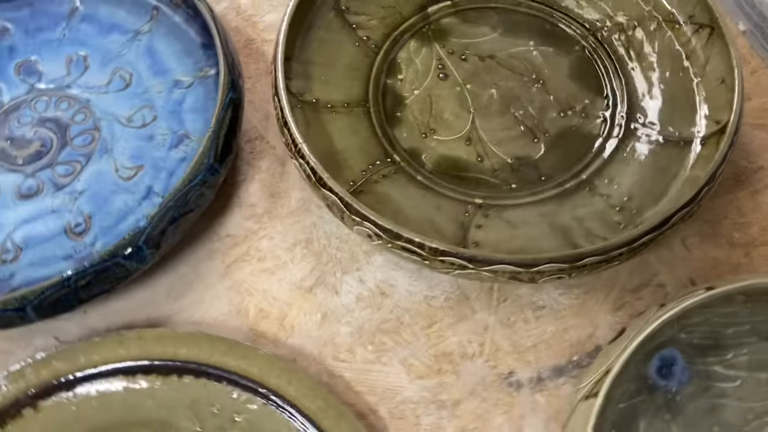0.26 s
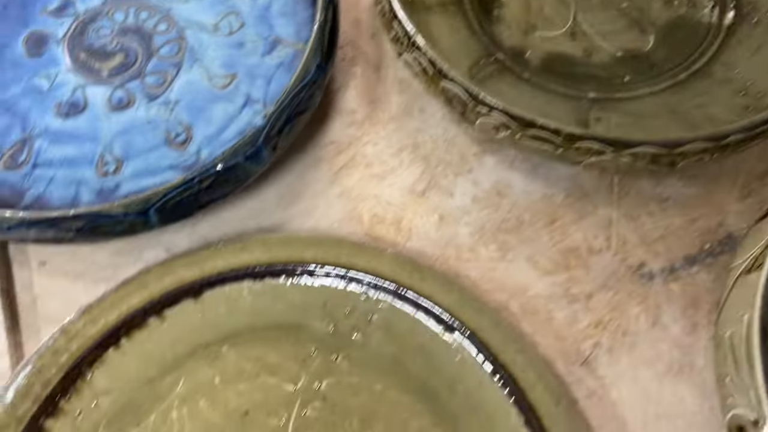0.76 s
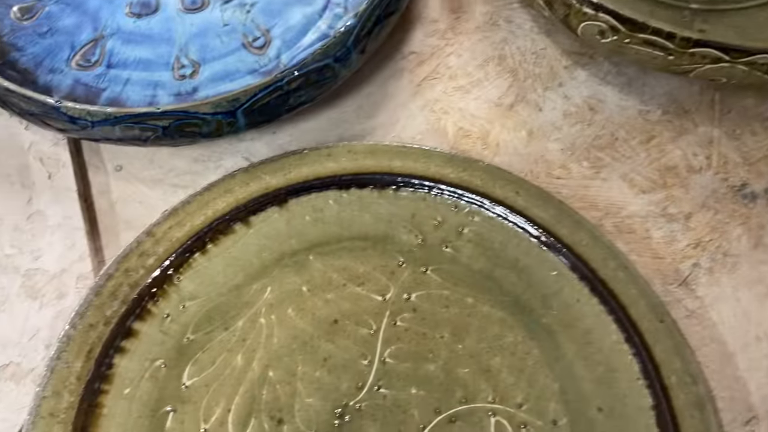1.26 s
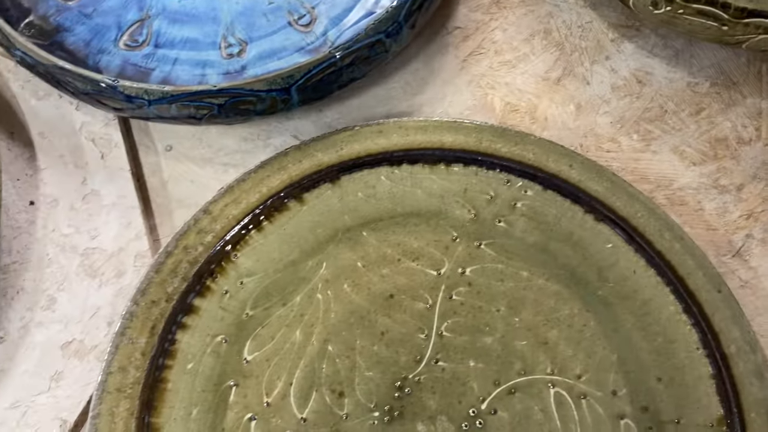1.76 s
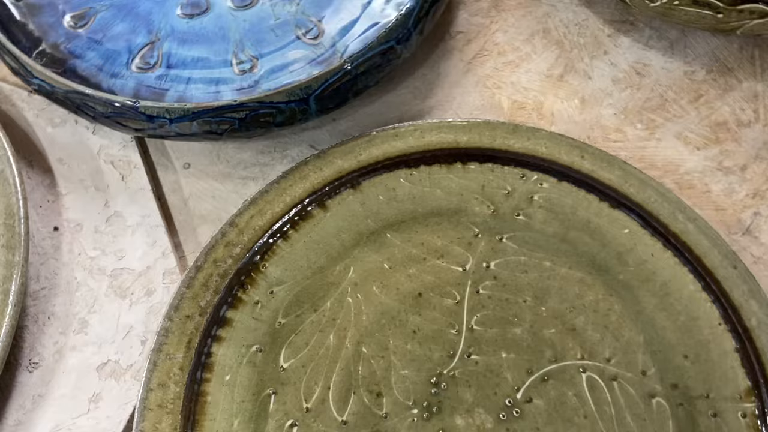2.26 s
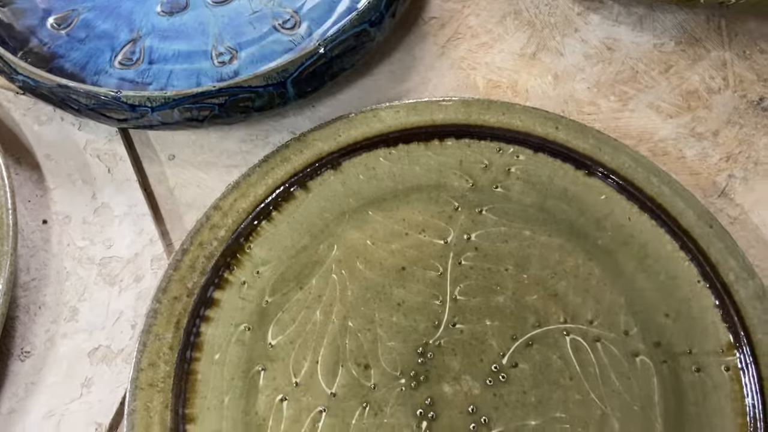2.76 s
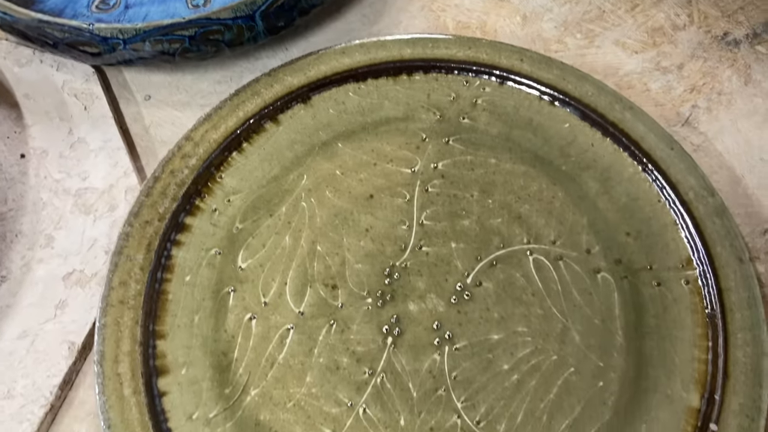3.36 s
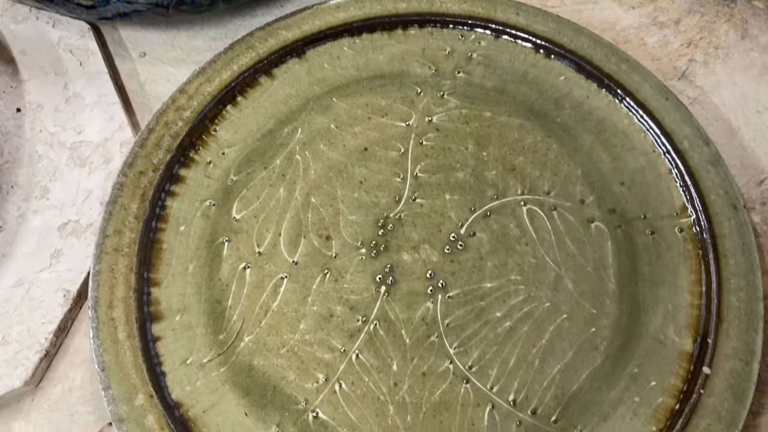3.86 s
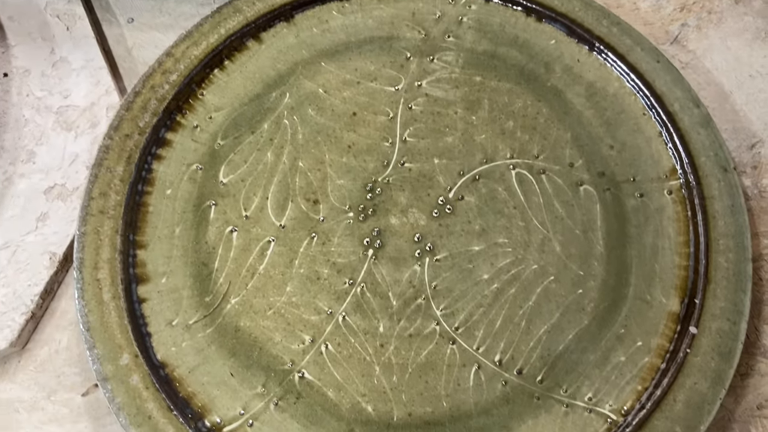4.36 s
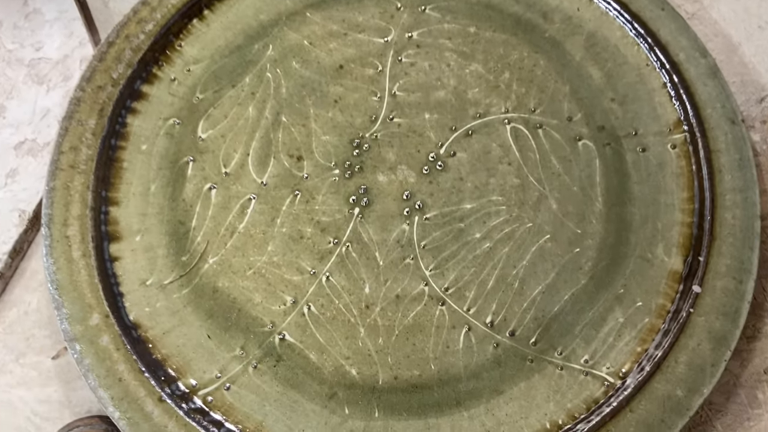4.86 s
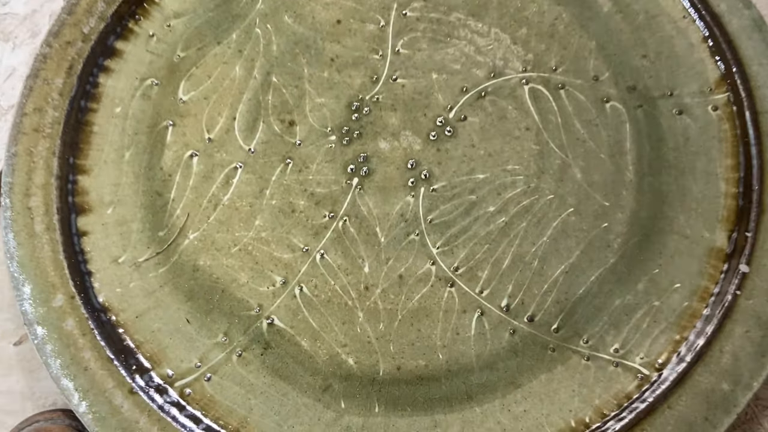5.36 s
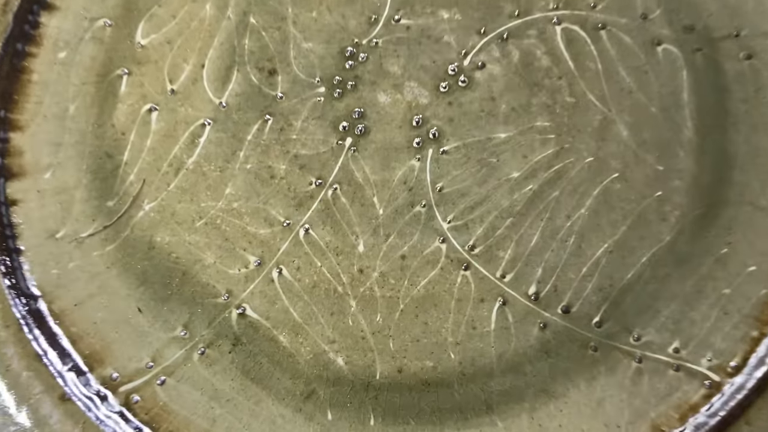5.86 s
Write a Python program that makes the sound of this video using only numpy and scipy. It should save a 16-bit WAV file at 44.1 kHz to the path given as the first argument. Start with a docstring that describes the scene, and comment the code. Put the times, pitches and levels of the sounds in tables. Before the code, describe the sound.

A quiet room with low building rumble, heard close on a handheld stereo phone. After tiny ticks, a heavy step lands at 0.1 s as a quick double thump on hollow boards, the loudest event; a glazed dish clatters dully until about 0.25 and a board groans briefly. Weaker, boomy thuds diminish to 0.65, with light rubs on the dish, a low creak near 0.7, cloth rustle and a gritty sole drag. Ticks cluster around 0.8-1.0, with a faint thud at 1.04. A lull follows. Ticks and a scratchy scuff at 1.5-1.8 lead to a firm thud at 1.86 with small aftersteps. Another thump and a clear tick come at 2.45, then soft sliding and fading low bumps to 2.8. Afterwards it is nearly silent: sparse crisp ticks, a weak low hum swelling around 4.1-4.6, a barely audible thin whistle near 4.4, and slight cloth movement at 5.4-5.7, ending about 6.1.

```python
"""Quiet room rumble and a tiny tick close by, then a heavy step on a hollow wooden floor, phone in hand.
Lighter steps follow and ring the board modes; a glazed dish rattles in its own modes and boards creak.
A sole scuffs as gritty noise, cloth rustles, something slides softly and small ringing ticks come from close by.
The room adds a low noise rumble, a hum that comes and goes, and a faint whistle; the phone hears it at two ports."""
import sys
import numpy as np
from scipy import signal
from scipy.fft import rfft, irfft, next_fast_len
from scipy.io import wavfile
from scipy.ndimage import uniform_filter1d, map_coordinates

SR = 44100
rng = np.random.default_rng(int(sys.argv[2]) if len(sys.argv) > 2 else 0)


def unload_wav(signal):
    """Save mono or channel-first audio to the path in sys.argv[1] as 16-bit WAV at rate SR, clipped to [-1, 1]."""
    wavfile.write(
        sys.argv[1],
        SR,
        np.round(np.clip(np.atleast_2d(signal).T, -1, 1) * 32767).astype(np.int16),
    )


N = 269225  # length [samples]


# Levels in the tables stand before the room, the ports and the microphone; spectra are relative.
def amp(db):
    """Decibels to gain."""
    return 10 ** (np.asarray(db) / 20)


def unit(x):
    """Scaled to rms 1."""
    return x / np.sqrt(np.mean(x ** 2) + 1e-20)


def along(points, hz):
    """(frequency [Hz], value) points read on a log frequency axis."""
    f, v = np.transpose(points)
    return np.interp(np.log(hz + 1), np.log(f + 1), v)


def curves(rows):
    """One value per sample for each column after the time."""
    s, *cols = np.transpose(rows)
    return [np.interp(np.arange(N) / SR, s, c) for c in cols]


def wobble(rate):
    """A smooth random curve, rate knots a second."""
    knots = rng.standard_normal(int(N * rate / SR) + 4)
    return map_coordinates(knots, [np.arange(N) * rate / SR])


def swell(s, hold, rise, fall):
    """Gain that climbs 20 dB in rise seconds, holds from s on, then drops 20 dB in fall seconds."""
    t = np.arange(N) / SR
    before, after = (s - t) / rise, (t - s - hold) / fall
    return amp(-20 * np.maximum(np.maximum(before, after), 0))


def filtered(x, response):
    """x times a complex response of frequency."""
    m = next_fast_len(x.shape[-1] + 8192)  # padded so that tails do not wrap round
    return irfft(rfft(x, m) * response(np.fft.rfftfreq(m, 1 / SR)), m)[..., :x.shape[-1]]


def resonances(modes):
    """Causal response of (frequency [Hz], width [Hz], level [dB]) resonances, signs alternating."""
    def response(f):
        return sum((-1) ** k * amp(db) * 1j * f * w / (c * c - f * f + 1j * f * w)
                   for k, (c, w, db) in enumerate(modes))
    return response


def rush(spectrum, alike, patchy_db):
    """Stereo noise of rms 1 with patches of random gain over time and frequency."""
    z = signal.stft(rng.standard_normal((2, N)), nperseg=512)[2]
    field = uniform_filter1d(rng.standard_normal(z.shape[1:]), size=8, axis=0)
    field = uniform_filter1d(field, size=6, axis=1)
    pair = signal.istft(z * amp(patchy_db * unit(field)), nperseg=512)[1][:, :N]

    def shape(hz):
        turn = np.arccos(np.clip(along(alike, hz), -1, 1)) / 2  # a wider angle gives less alike sides
        return amp(along(spectrum, hz)) * [np.cos(turn), np.sin(turn)]
    mid, side = filtered(pair, shape)
    return unit(np.array([mid + side, mid - side]))


def add(out, s, sound, pan_db):
    """Lays a stereo sound into out at time s; positive pan leans left."""
    part = out[:, round(s * SR):][:, :sound.shape[1]]
    part += sound[:, :part.shape[1]] * amp([[pan_db / 2], [-pan_db / 2]])


# Decay of the room: (frequency [Hz], t60 [s])
ROOM_DECAY = [(50, 0.5), (150, .45), (400, 0.46), (1000, 0.13), (3000, 0.19), (10000, 0.04)]
# How much of each pitch the room returns: (frequency [Hz], level [dB])
ROOM_COLOUR = [(60, -7.5), (150, -6), (400, -2), (1200, 0), (5000, -1.5)]


def in_room(x, wet_db):
    """A short sound plus its own noise tail, each frequency dying at the room's speed."""
    hz, t, z = signal.stft(rng.standard_normal((2, min(len(x), SR // 2))), SR, nperseg=512)
    t60 = along(ROOM_DECAY, hz)[:, None]
    decay = amp(along(ROOM_COLOUR, hz)[:, None] - 60 * t / t60)
    shared, apart = z * decay / np.sqrt(t60)
    apart = apart * (hz ** 2 / (hz ** 2 + 200 ** 2))[:, None]  # long waves reach both ports alike
    tail = signal.istft(np.array([shared + apart, shared - apart]), SR, nperseg=512)[1]
    wet = signal.fftconvolve(x[None], tail / np.linalg.norm(tail[0]), axes=1)[:, :len(x)]
    return x + amp(wet_db) * wet


# Rumble through the building: (frequency [Hz], density [dB per Hz])
RUMBLE_SPECTRUM = [(20, -1.5), (35, -5), (55, 0.5), (90, -6), (129, -15.5), (160, -15), (190, -18.5),
                   (312, -26.5), (640, -31), (1020, -39), (1800, -50.5), (3000, -69.5)]
# Rumble before its waver: (time [s], level [dB])
RUMBLE_LEVEL = [(0, -57), (.6, -50.5), (1, -53.5), (1.5, -59.5), (1.85, -50), (2.2, -52.5), (3, -57),
                (4.5, -56.5), (5.3, -55.5), (6.1, -57)]
# Likeness of the rumble at the two ports: (frequency [Hz], left-right likeness [0-1])
RUMBLE_ALIKE = [(60, 0.96), (180, 0.84), (550, 0.13), (1650, 0.058), (4970, 0.28), (15000, 0.041)]
# When the hum is there: (time [s], hold [s], rise [s], fall [s])
HUM_SWELL = (4.1, 0.49, 1.1, 0.2)
HUM_HZ, HUM_DB, HUM_WAVER_DB = 157.5, -69.5, 3.5
# When the broken whistle is there: (time [s], hold [s], rise [s], fall [s])
WHISTLE_SWELL = (4.3, .28, .06, .04)
WHISTLE_HZ, WHISTLE_DB = 4870, -97


def room_tone():
    """Low rumble through the building, a wavering hum that comes and goes, and a whistle of narrow noise."""
    level = amp(curves(RUMBLE_LEVEL)[0] + 1.7 * wobble(7.0))
    rumble = level * rush(RUMBLE_SPECTRUM, RUMBLE_ALIKE, patchy_db=1.16)
    tone = np.sqrt(2) * np.sin(2 * np.pi * HUM_HZ * np.arange(N) / SR)  # rms 1
    hum = amp(HUM_DB + HUM_WAVER_DB * wobble(6.6)) * swell(*HUM_SWELL) * tone
    narrow = unit(filtered(rng.standard_normal(N), resonances([(WHISTLE_HZ, 60, 0)])))
    whistle = amp(WHISTLE_DB + 2.5 * wobble(25.24)) * swell(*WHISTLE_SWELL) * narrow
    return rumble + hum + whistle


# Movement of the clothes, before flutter: (time [s], rustle level [dB], fine hiss level [dB])
CLOTHES = [(0.0, -87, -101), (0.15, -71, -76), (0.3, -67, -72), (0.83, -70, -76.5), (0.97, -66, -69.5),
           (1.14, -72, -73), (1.24, -81.5, -90), (1.54, -84.5, -88), (1.72, -68, -76.5),
           (1.87, -66.5, -75.5), (2.23, -71.5, -77), (2.8, -71, -77.5), (3.05, -80.5, -85),
           (3.64, -85.5, -92.5), (4.79, -85.5, -89), (5.28, -80.5, -82.5), (5.39, -70, -76.5),
           (5.55, -73.5, -78.5), (5.68, -73, -78), (5.78, -80.5, -84.5), (6.1, -82.5, -87)]
# Spectrum of the rustle: (frequency [Hz], density [dB per Hz])
RUSTLE_SPECTRUM = [(400, -25.5), (700, -2), (1000, -7), (2240, -5.5), (2700, -8), (4000, -6.5),
                   (6000, -12.5), (8000, -15), (12000, -41.5), (16000, -71)]
# Spectrum of the fine hiss: (frequency [Hz], density [dB per Hz])
FINE_SPECTRUM = [(4500, -37), (7000, -5), (9000, -7), (11000, 0), (12500, -4), (14000, -7), (16000, -15)]
# Likeness of near noises, also scuffs and slides: (frequency [Hz], left-right likeness [0-1])
NEAR_ALIKE = [(100, 0.92), (500, 0.43), (1500, 0.51), (4000, 0.29), (7000, 1), (12000, 1), (16000, 0.9)]


def clothes():
    """Cloth rubs while the body moves: two bands of noise fluttering together."""
    rustle_db, fine_db = curves(CLOTHES)
    rub_db = 0.27 * wobble(5) + 0.4503 * wobble(200)
    rustle = amp(rustle_db + rub_db) * rush(RUSTLE_SPECTRUM, NEAR_ALIKE, patchy_db=1.6)
    fine = amp(fine_db + rub_db) * rush(FINE_SPECTRUM, NEAR_ALIKE, patchy_db=2.5)
    return rustle + fine


# Small ticks close by: (time [s], relative level [dB], main pitch [Hz], bright part [dB])
TICKS = [(0.0074, -65, 1910, -31), (0.0322, -60.5, 2030, -43.5), (0.058, -58.5, 2220, -15),
         (0.449, -57.5, 3020, 0), (0.496, -68, 3000, -3), (0.5112, -57, 3340, -2), (0.741, -59, 2010, -15),
         (0.7613, -58, 2250, -15), (0.7956, -60, 1750, -14.5), (0.8207, -55, 1813, -3.5),
         (0.846, -53.5, 2210, -7.5), (0.875, -57, 2320, -18.5), (0.907, -59, 2265, 0),
         (0.9457, -52.5, 2190, -2.5), (0.983, -53, 2070, -12), (1.233, -60, 2500, -12),
         (1.32, -74.5, 2000, -12), (1.4088, -68.5, 2300, -13), (1.476, -66, 2400, -18),
         (1.4595, -63.5, 2465, -19), (1.5286, -54.5, 2940, -2), (1.5563, -53.5, 2240, -6),
         (1.625, -53.5, 2340, -5), (1.711, -46.5, 2100, 3.5), (2.454, -36.5, 2960, -14),
         (3.1317, -60.5, 3150, -10), (3.2287, -64, 1607, 2.5), (3.3101, -65.5, 3276, 1),
         (3.3748, -53, 3050, 3.5), (3.392, -57, 2520, 9.5), (3.4536, -59.5, 3294, 5),
         (3.477, -60.5, 1967, -12), (3.872, -73, 2220, -17.5), (3.8904, -61, 4130, 13),
         (3.8908, -62, 2396, -16), (4.003, -71.5, 1900, -15.5), (4.0679, -62.5, 3210, 9),
         (4.146, -64.5, 1605, -23), (4.324, -69, 2305, -23), (4.4587, -64, 1960, -15),
         (4.461, -60, 3900, 12.5), (4.494, -51.5, 3004, 8.5), (4.7834, -59, 2112, 3.5),
         (4.916, -65, 1864, 3), (4.9554, -67.5, 3170, 5.5), (4.99, -62, 2060, -1), (5.017, -66, 2500, 4.5),
         (5.503, -59, 3520, 9), (5.5197, -51, 2785, 4.5), (5.907, -60, 3110, 3.5)]
# Bright ring the phone's microphone adds to each tick: (frequency [Hz], width [Hz], level [dB])
BRIGHT_RING = [(6500, 760, 1), (11414, 3900, 1.5), (15000, 4500, -16)]
TICK_PAN_DB, PAN_PER_BRIGHT_DB = 2, 0.1  # the brighter ticks lie further left


def ticks():
    """Tiny slips at the hand and seams: a brief noise burst excites a low ring, and the phone's microphone adds
    a bright one."""
    out, t = np.zeros((2, N)), np.arange(SR // 10) / SR
    for s, db, hz, bright_db in TICKS:
        slip = rng.uniform(0.24, 1, len(t)) * amp(-60 * t / 0.00054)
        low = filtered(slip, resonances([(0.48 * hz, 350, -11), (hz, 550, 0), (3.7 * hz, 1200, -11)]))
        high = filtered(slip, resonances(BRIGHT_RING))
        sound = low / np.abs(low).max() + amp(bright_db) * high / np.abs(high).max()
        pan_db = TICK_PAN_DB + PAN_PER_BRIGHT_DB * bright_db
        add(out, s, amp(db + 2) * in_room(sound, wet_db=-5.5), pan_db)
    return out


# Contacts with the boards: (time [s], relative level [dB], boom [dB], hollow [dB], knock [dB], rap [dB],
# contact time [ms], lateness at 100 Hz [ms], share of the free ring left under the foot [0-1],
# relative crack [dB], relative click [dB])
THUMPS = [(0.096, -2.5, -2, -2, -3, 0.5, 0.82, 7.5, 0.46, -34, -12.5),
          (0.132, -3.5, -11, 1, -7.5, -21, 1.9, 5, 0.32, -48.5, -9),
          (0.186, -23.5, -21.5, -5.5, 7, 5.5, 0.99, 4, 0.25, -32.5, -5),
          (0.223, -11.5, 0.5, 0, -14, -19, 1.3, 2.2, 0.2, -51, -8),
          (0.245, -28.5, 2, 0, -10.5, -6.5, 0.35, 4.4, 0.22, -31, -9),
          (0.313, -22, -11, 2, -20, -11, 1.9, 2.1, 0.37, -58, -3),
          (0.36, -28.5, 3, 1.5, -9.5, -8, 1.56, 2.54, 0.68, -33, 0),
          (0.428, -19.5, -2.5, 4, -26.5, -14.5, 1.66, 4.4, 0.74, -43, -3),
          (0.478, -31.5, 5.5, 1, 4, -12, 2, 3, 0.29, -47, 2),
          (0.507, -23.5, 7.5, 0, 1.5, -4, 4.6, 2.55, 0.57, -49, 0),
          (0.57, -33.5, 0, 0.5, -31, -20, 0.71, 3.5, 0.4, -45, 0),
          (0.606, -39.5, -1, 3, -10, -15, 2, 2, 0.35, -45, 0),
          (0.665, -41, -13, -2, -8, -7, 1, 3.6, 0.51, -30.5, 0),
          (1.036, -31, -13.5, -4.5, -10.5, -9, 1.05, 4.1, 0.53, -44, -3),
          (1.18, -46.5, -2, -4, -17.5, -17, 0.39, 4.5, 0.92, -20.5, -5.5),
          (1.71, -54, -23.5, -8, 9.5, 17.5, 0.55, 3.9, 0.42, -10.5, 0),
          (1.758, -38.5, 3.5, 7, 18, 15, 4, 2.4, 0.33, -26, 1),
          (1.861, -10, -8, 0, -0.5, 2, 3.57, .6, 0.32, -32, -13),
          (1.897, -20.5, -3, -7, -4, -14, 3, 2.45, 0.45, -40, 0),
          (1.967, -21.5, -3, 4, 1.5, -11.5, 1.8, 2, 0.32, -26.5, -16),
          (2.058, -25, -7, 2, -24, -19, 0.59, 2.1, 0.36, -55.5, 0),
          (2.432, -55.5, -19, -2.5, -10, 8, 1.1, 2.4, 0.51, -39, 0.5),
          (2.452, -10, 2.5, 1, -1.5, -2, 1.9, 3.26, 0.41, -24.5, 3),
          (2.544, -25, 1, -5, 7, -1, 5, 4.4, 0.55, -33, -9),
          (2.619, -33.5, 4.5, 0, 0, -8, 4, 3, 0.34, -41, 0),
          (2.734, -34, 13.5, 7.5, -1, -1, 3.7, 1.05, 0.39, -39, -1)]
# Modes of the boards ringing freely: (frequency [Hz], level [dB], t60 [s])
BOARDS = [(53.7, -15.5, 0.45), (62.96, -3.5, 0.45), (74, 5.5, 0.44), (86.7, -0.5, 0.3), (109.9, 2, 0.44),
          (122.1, -0.5, 0.42), (137.14, 0.5, 0.26), (169, 3, 0.24), (191.4, -3, 0.25), (220.4, -5, 0.34),
          (268.3, 2.5, 0.18), (299.6, 4.5, 0.16), (347.6, 0.05, 0.22), (386, -2.5, 0.21),
          (417.8, 4.5, 0.11), (489.7, 7.5, 0.087), (564, -1, 0.14), (619.2, 5.5, 0.075), (653, -0.5, 0.12),
          (711.4, -6, 0.17), (770.4, -2, 0.11), (869, -2.5, 0.08), (908, -1.5, 0.072), (987, -0.5, 0.083),
          (1128, -6, 0.11), (1290, -3, 0.044), (1560, -12.5, 0.057), (1760, -15, .05), (2080, -23.5, 0.051),
          (2340, -26.5, 0.057)]
# Where boom, hollow, body, knock and rap lie: (frequency [Hz])
REGIONS_HZ = [75, 115, 175, 380, 800]
# Spectrum of the crack: (frequency [Hz], density [dB per Hz])
CRACK_SPECTRUM = [(300, -27.5), (800, -1.5), (1500, -3.5), (2200, -9.5), (3000, -11), (5000, -25.5),
                  (7000, -32.5), (11000, -43), (16000, -60)]
DULLING_DB = 20.5  # loss per octave [dB], reached well above 1 / contact time


def steps():
    """Every contact rings the boards; where it lands sets boom and knock, and a longer contact is duller."""
    out, t = np.zeros((2, N)), np.arange(SR * 2 // 5) / SR
    hz, level_db, t60 = np.transpose(BOARDS)[:, :, None]
    for (s, db, boom_db, hollow_db, knock_db, rap_db,
         contact_ms, late_ms, damping, crack_db, click_db) in THUMPS:
        regions = list(zip(REGIONS_HZ, [boom_db, hollow_db, 0, knock_db, rap_db]))
        colour_db = along(regions, hz) + rng.normal(0, 1.5, hz.shape)
        colour_db = colour_db - DULLING_DB / 2 * np.log2(1 + (hz * contact_ms / 1000) ** 2)
        # low bending waves travel slowly and arrive last
        since = np.maximum(t - late_ms / 1000 * (100 / hz) ** 0.85, 0)
        rise = 1 - np.exp(-since * hz / 0.74)
        decay = amp(level_db + colour_db - 60 * since / (t60 * damping))
        ring = np.sum(decay * rise * np.sin(2 * np.pi * hz * since), axis=0)

        grit = unit(filtered(rng.standard_normal(len(t)), lambda f: amp(along(CRACK_SPECTRUM, f))))
        edge = unit(filtered(grit, lambda f: 1 + f / 1500))  # the first instant is brighter
        snap = .9 * grit * amp(-60 * t / 0.066) * (1 - np.exp(-t / 0.0008))
        click = 2.617 * edge * amp(-60 * t / 0.0081) * (1 - np.exp(-t / 0.0009))
        roomy = in_room(amp(db - 5) * ring + amp(db + crack_db - 5) * snap, wet_db=-2.5)
        direct = amp(db + crack_db + click_db - 7.5) * click  # the click has no room tail
        add(out, s, roomy + direct, pan_db=0)
    return filtered(out, lambda f: (1j * f / (48 + 1j * f)) ** 2)  # boards radiate the deepest bass poorly


# Modes of a dish standing loose: (frequency [Hz], level struck [dB], t60 struck [s],
# level rubbed [dB], applied twice)
DISH = [(575, 2.5, .12, 0.5), (867, 4.5, .11, 0.5), (1082, -3.5, 0.089, -6.5), (1200, 2, .12, -0.5),
        (1265, -1.5, .12, -6), (1470, -2, 0.18, -7.5), (1707, -2.5, 0.07, -1), (1880, -4, .04, -8),
        (2379, -14.5, .2, -6), (2428, -8, .19, -14), (2993, -12, .12, -14), (3128, -10, 0.11, -16),
        (3343, -14, 0.12, -14), (3591, -11, .1, -10), (3957, -16, .12, -11), (4300, -20, .08, -18),
        (4660, -20.5, .08, -20), (5290, -36, .06, -25), (6200, -32.5, 0.068, -25), (7250, -30, .08, -25)]
# The dish jumps and bounces: (time [s], relative level [dB], highest modes [dB], relative grit [dB])
RATTLES = [(0.101, -52, 16, -6), (0.185, -46.5, -6, -3.5), (0.206, -56.5, -6, -6), (.224, -62, -6, -6)]
# Light rubs on the dish: (time [s], hold [s], rise [s], fall [s], level [dB])
GRAZES = [(0.437, 0.033, 0.039, .02, -68.5), (0.513, .03, .03, .03, -75), (0.563, 0.07, .025, 0.03, -63),
          (0.647, 0.02, 0.02, 0.019, -53)]
RIM_HZ = 5000  # the highest modes lie above
HELD_WIDTH_HZ = 61  # width of each mode under the touch


def dish():
    """The shaken dish clatters under noisy blows, and light rubs stutter in its modes."""
    modes = [(hz, np.log(1000) / (np.pi * t60), db) for hz, db, t60, _ in DISH]  # width from the decay time
    scrape = resonances([(1000, 700, 0), (1800, 800, 0), (3400, 1800, -6)])
    rattle, t = np.zeros(SR), np.arange(SR * 2 // 5) / SR
    for s, db, rim_db, grit_db in RATTLES:  # a landing is a quick clatter, not one clean blow
        force = amp(31 - 60 * t / 0.024) * rng.standard_normal(len(t))
        force[0] += amp(40.5)
        burst = amp(grit_db - 60 * t / 0.04) * rng.standard_normal(len(t))
        grit = filtered(burst, lambda f: scrape(f) ** 2)
        struck = resonances([(hz, w, level + rim_db * (hz > RIM_HZ)) for hz, w, level in modes])
        ring = filtered(force, struck)
        rattle[round(s * SR):][:len(t)] += amp(db) * (ring + amp(20) * grit)

    stroke = sum(amp(db) * swell(*shape)[:SR] for *shape, db in GRAZES)
    held = resonances([(hz, HELD_WIDTH_HZ, rub_db) for hz, *_, rub_db in DISH])
    touch = lambda f: held(f) ** 2  # dark valleys between the modes
    grit = rng.standard_normal(SR) * amp(1.7 * wobble(91.2)[:SR])
    rub = filtered(stroke * grit, touch) / np.std(filtered(grit, touch))
    return in_room(rattle + rub, wet_db=-8)


# A board groans: (time [s], hold [s], rise [s], fall [s], level [dB], pitch [Hz], sag [Hz per s], octave [dB])
CREAKS = [(0.224, 0.029, .015, 0.088, -53, 735.6, 20, -11), (0.678, 0.063, 0.025, 0.049, -55, 228, 24, -5)]


def creak():
    """A wavering, sagging tone and its octave as the weight shifts."""
    out = np.zeros(N)
    for s, hold, rise, fall, db, hz, sag, octave_db in CREAKS:
        since = np.clip(np.arange(N) / SR - s, 0, .2)
        pitch = (hz - sag * since) * (1 + 0.016 * wobble(60))
        turn = 2 * np.pi * np.cumsum(pitch) / SR
        tone = amp(1.5 * wobble(47)) * np.sin(turn)
        octave = amp(octave_db + 3.9 * wobble(70)) * np.sin(2 * turn)
        out += np.sqrt(2) * amp(db) * swell(s, hold, rise, fall) * (tone + octave)
    return out


# Drags of the sole: (time [s], hold [s], rise [s], fall [s], level [dB], dullness [0-1],
# share caught in the resonances [0-1]); rise and fall span 20 dB
SCUFFS = [(0.642, 0.047, 0.44, 0.036, -64.5, 0, 0.33), (0.797, 0.0012, .1, 0.064, -63, 1, 0.42),
          (1.524, 0.032, 0.0075, 0.078, -61, 0.55, 0.99), (1.712, 0.004, 0.0043, 0.023, -43, 0, 0.66),
          (1.8, 0.05, 0.068, 0.056, -42, 0.53, 0.6)]
# Spectrum of the sole's grit: (frequency [Hz], density [dB per Hz])
SOLE_SPECTRUM = [(88, -29), (150, -1), (500, -9.5), (1200, -14), (2500, -13.5), (4900, -22), (8000, -31),
                 (11000, -32), (16000, -46.5)]
# Resonances under the sole: (frequency [Hz], width [Hz], level [dB])
SQUEAK = [(479.7, 180, -8.5), (960, 179.5, 1), (1255, 69, -3), (1750, 21, -15), (2206, 47, -9.5)]
STUTTER_DB = 1.7  # a drag catches and lets go


def scuffs():
    """A sole drags: gritty noise, partly caught in narrow resonances."""
    stutter = amp(2.5 * wobble(300) + STUTTER_DB * wobble(45))
    grit = unit(stutter * rush(SOLE_SPECTRUM, NEAR_ALIKE, patchy_db=0.5))
    caught = unit(filtered(grit, resonances(SQUEAK)))
    drags = np.array([grit, caught])
    dulled = filtered(drags, lambda f: 1 / (1 + (f / 1200) ** 2))
    out = np.zeros((2, N))
    for s, hold, rise, fall, db, dullness, catch in SCUFFS:
        plain, ringing = (1 - dullness) * drags + dullness * dulled
        out += amp(db) * swell(s, hold, rise, fall) * unit(plain + catch * ringing)
    return out


# Something slides softly: (time [s], hold [s], rise [s], fall [s], level [dB])
SLIDES = [(2.617, 0.096, 0.17, 0.29, -72), (5.37, 0.309, .04, 0.074, -89)]
# Spectrum of the slide: (frequency [Hz], density [dB per Hz])
SLIDE_SPECTRUM = [(400, -17), (800, -11), (1400, -3), (2200, -4), (3200, -32), (6000, -29.5)]


def slides():
    """A soft rub in the middle register: patchy noise with a light flutter."""
    stroke = sum(amp(db) * swell(*shape) for *shape, db in SLIDES)
    return stroke * amp(1.7 * wobble(40)) * rush(SLIDE_SPECTRUM, NEAR_ALIKE, patchy_db=6.0)


# Lead of the left port, before the bass is drawn together: (frequency [Hz], phase [rad])
PORT_LEAD = [(130, -0.5), (500, 0.73), (1200, 1.21), (4000, 1.28), (7300, 0.92), (9000, -5.5),
             (11100, -4.5), (13200, -9.5), (15200, -12), (16500, -15)]
# Balance of the ports: (frequency [Hz], left-right [dB])
PORT_BALANCE = [(60, 1), (130, 0.5), (290, 2), (640, 1), (1410, -3), (3100, 2), (6820, 0), (15000, -0.5)]


def at_ports(x):
    """Near sounds reach the two ports with a lead and a balance that depend on pitch."""
    half = np.array([[.5], [-.5]])

    def port(f):
        short = f ** 2 / (f ** 2 + 130 ** 2)  # the longest waves arrive together
        return amp(half * along(PORT_BALANCE, f)) * np.exp(1j * half * short * along(PORT_LEAD, f))
    return filtered(x, port)


def scene():
    """All sources at the two microphone ports."""
    near = clothes() + ticks() + steps() + creak() + scuffs() + slides()
    add(near, 0, dish(), pan_db=1.0)
    return at_ports(near) + room_tone() * amp([[.7], [-.7]])


TOP_HZ = 16300  # band limit of the microphone


def record(dry):
    """The phone's microphone cuts the deepest bass and keeps nothing above its band limit."""
    bass_cut = lambda hz: (1j * hz) ** 2 / (44 ** 2 - hz ** 2 + 1.1j * hz * 44)
    return filtered(dry, lambda hz: bass_cut(hz) ** 2 * (hz < TOP_HZ))


dry = scene()
out = record(dry)
unload_wav(out)
```